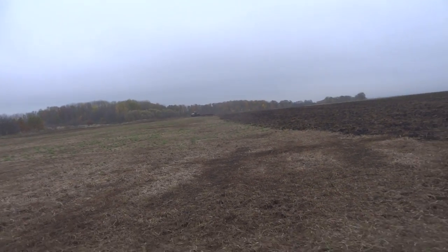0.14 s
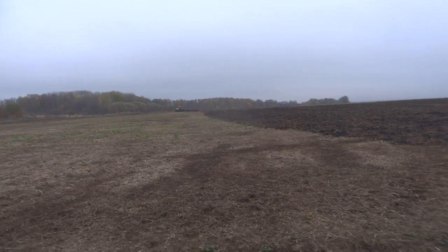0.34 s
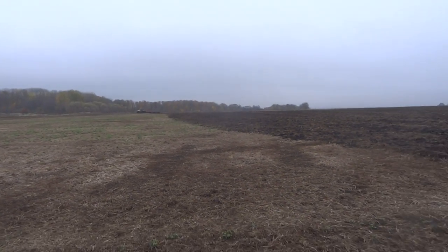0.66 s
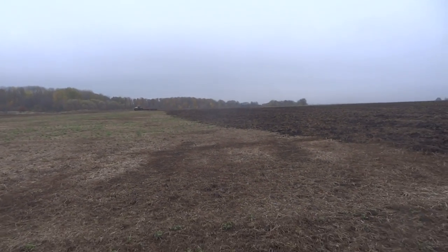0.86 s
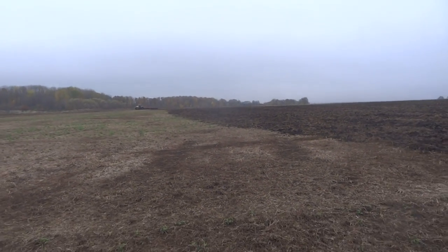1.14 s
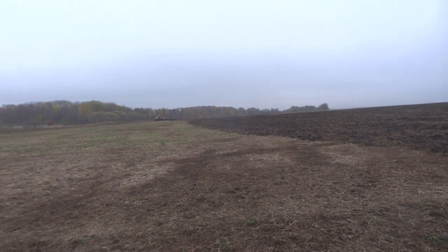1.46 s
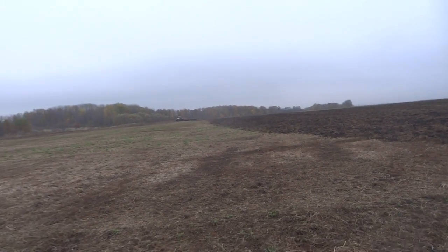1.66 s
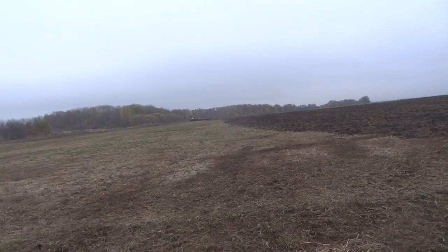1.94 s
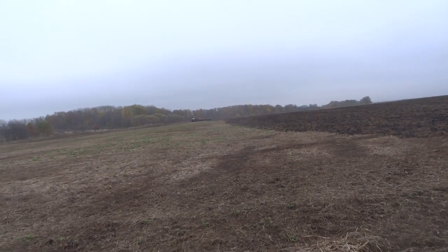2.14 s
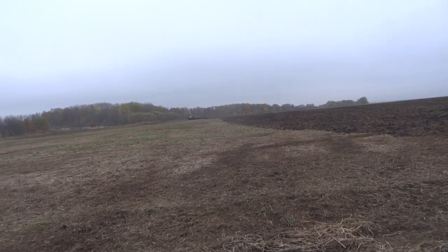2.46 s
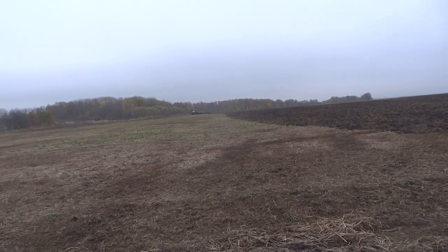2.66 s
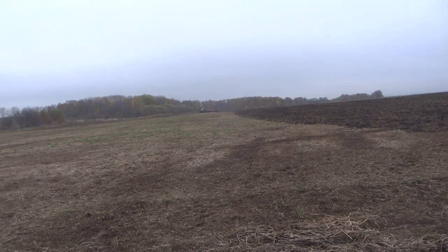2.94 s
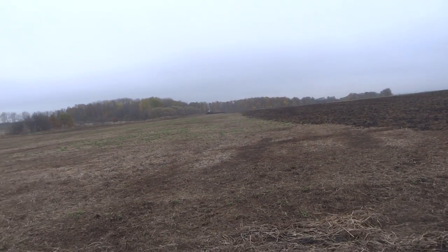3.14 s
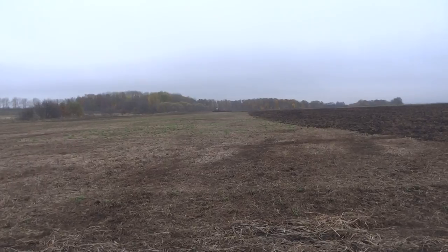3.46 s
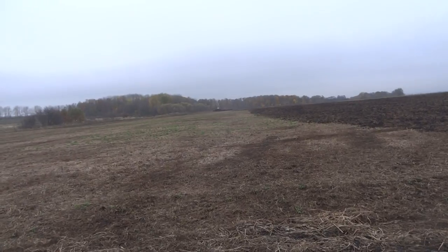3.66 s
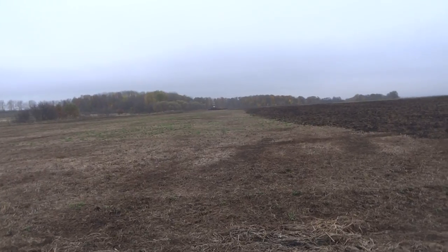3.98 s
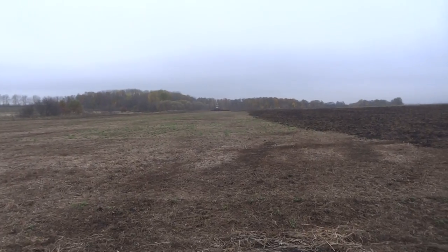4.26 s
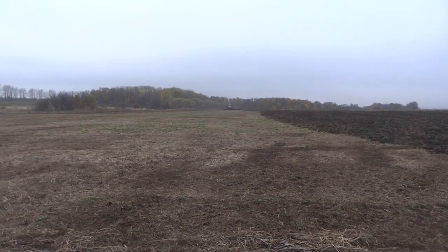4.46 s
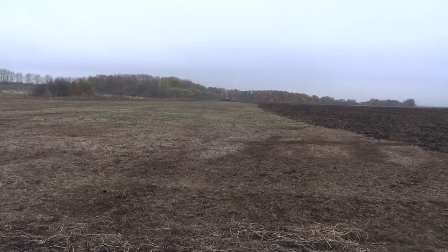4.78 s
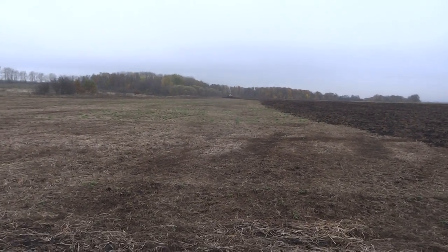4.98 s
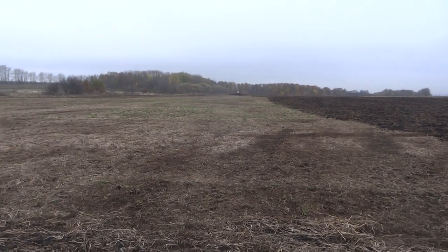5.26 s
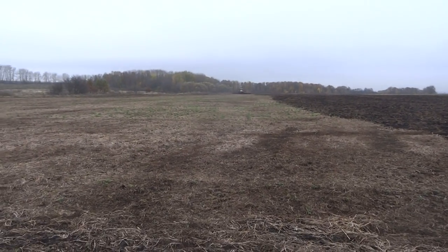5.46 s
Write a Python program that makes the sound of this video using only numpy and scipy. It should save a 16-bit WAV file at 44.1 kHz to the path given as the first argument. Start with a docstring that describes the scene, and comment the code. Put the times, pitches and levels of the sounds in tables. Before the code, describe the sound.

A far tractor holds a low, nearly constant diesel hum with faint clatter and metallic rattle in an open field. Wind rushes, hisses and rumbles on an unshielded hand-held microphone. Thumps crowd together from half a second to one and a half, strike hard again around three, then after a bright sleeve swish and dry ticks near four seconds, return around four and a half as the wind strengthens.

```python
"""From the start a far tractor drones over a field (exhaust sines, pulsed noise for clatter and rattle) while
wind rushes, hisses, fizzes and thinly whistles (coloured noise) and rumbles on a hand-held camera's microphone.
A sleeve rubs (grainy noise) and a tick rings the case (sines); from 0.5 s eddies thump (noise bursts), in clusters.
Around 4.1 s the sleeve swishes amid scrapes and ticks; then thumps, rubs and wind go on.
Throughout, a limiter ducks everything under loud thumps."""
import sys
import numpy as np
from scipy import signal
from scipy.fft import rfft, irfft, next_fast_len
from scipy.io import wavfile
from scipy.ndimage import uniform_filter1d, minimum_filter1d, map_coordinates

SR = 44100
rng = np.random.default_rng(int(sys.argv[2]) if len(sys.argv) > 2 else 0)


def int16_out(signal):
    """Quantize to a 16-bit WAV file."""
    q = np.round(np.clip(np.atleast_2d(signal).T, -1, 1) * 32767)
    wavfile.write(sys.argv[1], SR, q.astype(np.int16))


N = 247401

# Exhaust drone. Each row: time in seconds, rms level in dB.
DRONE_LEVEL_DB = [(0, -32), (.6, -31), (1.3, -32), (2.1, -27), (2.8, -27), (3.6, -28), (4.2, -26),
                  (4.9, -31.5), (5.6, -30)]
# Exhaust lines. Each row: multiple of half the firing rate, relative level in dB.
EXHAUST_LINES = [(2, 0.5), (3, -17.5), (4, -23.5), (5, -33)]
# Firings per second, and the spread of their random wander.
FIRING_HZ, HUNT_HZ = 105.6, 0.24
# Engine clatter. Each row: time in seconds, level in dB.
CLATTER_LEVEL_DB = [(0.0, -46.5), (0.87, -45.5), (1.4, -45), (1.76, -44.5), (2.28, -41), (2.86, -47.5),
                    (3.8, -47), (4.29, -44), (5.6, -43.5)]
# Colour of the engine block's clatter. Each row: frequency in Hz, relative density in dB per Hz.
BLOCK_SPECTRUM = [(250, -28), (560, 3), (850, -4.5), (1230, 2), (1600, -8.5), (16000, -62)]
# Rattle of tracks and disks across the field. Each row: time in seconds, level in dB.
RATTLE_LEVEL_DB = [(0, -38), (.24, -37.5), (.6, -56), (1.1, -45), (1.32, -43.5), (2.0, -44), (2.65, -46.5),
                   (3.17, -54), (3.8, -46), (5.6, -47.5)]
# Colour of the steel tracks and disks. Each row: frequency in Hz, relative density in dB per Hz.
LINKS_SPECTRUM = [(600, -35), (1800, -2.5), (2800, 0.5), (3700, -5), (11000, -51)]
# Bands of clatter that ring out. Each row: middle in seconds, level in dB, length in seconds, centre in Hz.
CLATTER_RINGS = [(0.06, -44, 0.13, 2850), (0.1, -46, 0.25, 3620), (0.2, -44, 0.47, 1600),
                 (1.008, -43, 0.94, 1890), (1.304, -38.5, 0.34, 1300), (1.396, -57, 0.52, 3600),
                 (2.04, -48, 0.18, 3900), (2.545, -48.5, 0.28, 2700), (3.396, -50.5, 0.66, 1670),
                 (4.31, -41.5, 0.39, 1103), (4.943, -41, 0.42, 1094)]
# Bounce off whoever holds the camera, later as the arm reaches out. Each row: time in seconds, delay in seconds.
ECHO_DELAY_S = [(.1, .00174), (.9, .00163), (1.6, .00166), (2.3, .00175), (3.3, .00182), (4.4, .00183),
                (5.6, .00176)]
TRACTOR_ECHO_DB = -4

# Low rush over the field. Each row: time in seconds, level in dB.
RUSH_LEVEL_DB = [(0.0, -46.5), (1.71, -45.5), (2.23, -55), (3.36, -46.5), (3.62, -38.5), (3.8, -43.5),
                 (4.74, -41), (4.97, -37), (5.6, -38.5)]
# Colour of the rush. Each row: frequency in Hz, relative density in dB per Hz.
RUSH_SPECTRUM = [(200, -26), (420, -2.5), (600, -3), (900, 0), (1450, -2), (2000, -8), (3000, -27),
                 (8000, -60)]
# Hiss in the stubble. Each row: time in seconds, level in dB.
HISS_LEVEL_DB = [(0, -38), (.42, -39.5), (1.06, -42), (1.91, -50.5), (3.12, -55), (4.12, -47), (4.35, -34),
                 (4.56, -33.5), (4.69, -41.5), (5.12, -40.5), (5.3, -35.5), (5.6, -37)]
# Colour of the hiss. Each row: frequency in Hz, relative density in dB per Hz.
HISS_SPECTRUM = [(700.0, -43), (1150.0, 3.5), (1600.0, 4.5), (2300.0, 7), (2900.0, 6.5), (3500.0, -3.5),
                 (5000.0, -30)]
# Fizz in the dry straw. Each row: time in seconds, level in dB.
FIZZ_LEVEL_DB = [(0.0, -48.5), (0.26, -49.5), (0.81, -54), (2.02, -50.5), (2.8, -53.5), (3.15, -56),
                 (3.45, -55), (4.02, -53.5), (4.44, -46), (4.7, -50), (5.18, -48.5), (5.6, -50.5)]
# Colour of the fizz. Each row: frequency in Hz, relative density in dB per Hz.
FIZZ_SPECTRUM = [(2600.0, -35), (3400.0, -1), (4300.0, 3), (5600.0, -2.5), (7500.0, -8), (13000.0, -44),
                 (16000.0, -36)]

# Whistle centre. Each row: time in seconds, frequency in Hz.
WHISTLE_PITCH_HZ = [(0, 6706), (1, 6780), (4.5, 6880), (5.05, 6406), (5.6, 6875)]
# Whistle puffs. Each row: middle in seconds, level in dB before PUFF_TRIM_DB, length in seconds.
WHISTLE_PUFFS = [(.2, -42.5, 0.053), (1.9, -43, 0.16), (2.23, -41.5, 0.16), (2.74, -43, 0.044),
                 (2.97, -51, 0.1), (3.44, -42, 0.055), (5.27, -46.5, 0.18)]
# Idle level against the fizz, and trim on the puffs.
WHISTLE_IDLE_DB, PUFF_TRIM_DB = -1.0, -4.5

# Wind rumble between eddies. Each row: time in seconds, level in dB before BUFFET_LIFT_DB and BUFFET_SWING.
BUFFET_CURVE_DB = [(0.0, -36.5), (0.44, -45), (1.27, -35), (2.36, -45), (3.2, -37), (3.83, -52.5),
                   (4.27, -37), (4.75, -31), (5.31, -42)]
# Lift of the rumble's mean level, and factor on its dB swing about that mean.
BUFFET_LIFT_DB, BUFFET_SWING = 8.0, 0.79
# Colour of the rumble. Each row: frequency in Hz, relative density in dB per Hz.
RUMBLE_SPECTRUM = [(10, 0), (22, -30), (35, -3), (65, 1.5), (100, 2), (170, -6), (240, -13), (320, -22),
                   (700, -52)]
# Eddies on the microphone. Each row: start in seconds, force in dB before trims, length in seconds.
EDDY_HITS = [(0.531, -25.5, 0.037), (0.718, -18.5, 0.0098), (0.746, -19.5, 0.037), (0.773, -16, 0.039),
             (0.838, -15, 0.023), (0.873, -14.5, 0.019), (1.022, -26.5, 0.048), (1.071, -19, 0.012),
             (1.128, -10.5, 0.031), (1.29, -15, 0.027), (1.425, -23.5, 0.04), (1.484, -15, 0.037),
             (1.548, -15.5, 0.024), (1.909, -21, 0.067), (2.046, -24.5, 0.052), (2.088, -30, 0.025),
             (2.791, -28.5, 0.036), (3.011, -16.5, 0.03), (3.032, -11.5, 0.034), (3.066, -11.5, 0.056),
             (3.11, -13, 0.045), (3.259, -26.5, 0.033), (3.385, -30, 0.039), (4.082, -26.5, 0.035),
             (4.305, -30, 0.028), (4.387, -23, 0.045), (4.543, -20.5, 0.041), (4.614, -17, 0.025),
             (4.662, -11.5, 0.025), (4.721, -14, 0.024), (4.753, -13.5, 0.054), (4.856, -23.5, 0.093),
             (4.938, -19.5, 0.087), (5.09, -21, 0.031), (5.212, -29, 0.019)]
# Each eddy drags a wake of rumble: level against the eddy's force, and length over the eddy's.
WAKE_DB, WAKE_STRETCH = -15.5, 1.67
# Colour of the eddies. Each row: frequency in Hz, relative density in dB per Hz.
EDDY_SPECTRUM = [(25, -12), (70, -8), (150, 5.5), (240, -2.5), (350, -11.5), (480, -16.5), (900, -38),
                 (2000, -78)]
# Flutter of air tearing off each port. Each row: frequency in Hz, relative density in dB per Hz.
TEAR_SPECTRUM = [(170, -37), (310, 6), (500, -6.5), (1000, -18.5), (2500, -58)]
# Eddy travel from left port to right as the wind turns. Each row: time in seconds, lag in seconds.
CROSSING_LAG_S = [(.8, -.0007), (1.4, -.0011), (3.1, -.0007), (4.4, .0008), (5.1, .0006)]

# Sleeve rubs. Each row: middle in seconds, level in dB, length in seconds, treble gain in dB.
SLEEVE_RUBS = [(.15, -60, 0.14, 2), (2.032, -55, 0.46, -2), (2.99, -53.5, 0.091, 4), (3.44, -58, 0.2, 3),
               (3.8, -57, 0.38, 2), (4.477, -45.5, 0.19, -8), (4.825, -49.5, 0.17, -9),
               (5.382, -52.5, 0.57, -16)]
# Constant faint stirring, and where the treble begins.
STIR_DB, TREBLE_HZ = -65.5, 11200
# Colour of the cloth. Each row: frequency in Hz, relative density in dB per Hz.
CLOTH_SPECTRUM = [(2500, -21), (6000, -2), (8000, 2.5), (9000, 3.5), (9800, 6), (10800, -3), (13000, 4.5),
                  (15800, -17)]
# Brief scrapes. Each row: start in seconds, level in dB before a 0.5 dB cut, length in seconds.
SLEEVE_SCRAPES = [(3.9, -37, 0.089), (4.087, -35, 0.078), (4.59, -38, 0.029), (4.8, -38.5, 0.049)]
# Colour of scrapes and of tick grit. Each row: frequency in Hz, relative density in dB per Hz.
SCRAPE_SPECTRUM = [(700, 3), (1500, 5.5), (6000, 1), (9800, -4), (13000, -7), (15800, -13)]
# Long swish, falling in pitch as the sleeve slows. Each row: time in seconds, centre in Hz, level in dB.
SLEEVE_SWISH = [(3.5, 13200, -100), (3.76, 12900, -58), (4.07, 12140, -54.5), (4.115, 9900, -32),
                (4.165, 9900, -48), (4.27, 9630, -39.5), (4.45, 8280, -57), (4.6, 8400, -100)]
SWISH_HALF_WIDTH_HZ = 1150

# Hand on the camera. Each row: start in seconds, level in dB, body-mode gain in dB, left over right in dB.
HAND_TICKS = [(0.203, -28, -20, -1), (3.74, -27, -20, 2), (3.9079, -25.5, 8, -11), (3.9094, -26, 7, -6),
              (3.934, -28, 2, 16), (4.088, -20, -2, 4), (4.0908, -14.5, -1, 6), (4.1915, -11.5, -2, 4.5),
              (4.4135, -20, 4, 5), (4.962, -31.5, 9, -13)]
# Camera case modes. Each row: frequency in Hz, relative level in dB.
CASE_MODES = [(1450, 0.5), (3600, -7.5), (5300, -9), (7200, -7), (9700, -3.5), (11300, -18.5)]
CASE_T60_S, BODY_BELOW_HZ = .008, 4500

# Left-right likeness of stereo noise. Each row: frequency in Hz, coherence from 0 to 1.
COHERENCE = [(30, 1), (100, 0.27), (400, 0.58), (800, 0.92), (1500, 0.96), (8000, 1), (13000, 0.93)]
TOP_HZ = 15850


def amp(db):
    """Decibels to gain."""
    return 10 ** (np.asarray(db) / 20)


def unit(x):
    """Scale to rms 1."""
    return x / np.sqrt(np.mean(x ** 2) + 1e-20)


def along(points, hz):
    """Interpolate (Hz, value) points on a log axis."""
    f, v = np.transpose(points)
    return np.interp(np.log(hz + 1), np.log(f + 1), v)


def curves(rows):
    """One value per sample for each column after the time."""
    s, *cols = np.transpose(rows)
    return [np.interp(np.arange(N) / SR, s, c) for c in cols]


def wobble(rate_hz):
    """Smooth random curve through rate_hz normal-distributed knots a second."""
    knots = rng.standard_normal(int(N * rate_hz / SR) + 4)
    return map_coordinates(knots, [np.arange(N) * rate_hz / SR])


def filtered(x, response):
    """Multiply the spectrum of x by a response of frequency."""
    m = next_fast_len(N + SR // 2)
    return irfft(rfft(x, m) * response(np.fft.rfftfreq(m, 1 / SR)), m)[..., :N]


def spread(pair, response):
    """Colour two unrelated signals and mix them to left and right at the tabled coherence, rms 1."""
    def mid_side_response(hz):
        angle = np.arccos(np.clip(along(COHERENCE, hz), -1, 1)) / 2
        return response(hz) * np.array([np.cos(angle), np.sin(angle)])

    mid, side = filtered(pair, mid_side_response)
    return unit(np.array([mid + side, mid - side]))


def patchy(depth_db):
    """Two white noises sharing patches of random gain in time and frequency."""
    z = signal.stft(rng.standard_normal((2, N)), nperseg=512)[2]
    field = uniform_filter1d(rng.standard_normal(z.shape[1:]), size=9, axis=0)
    field = uniform_filter1d(field, size=14, axis=1)
    return signal.istft(z * amp(depth_db * unit(field)), nperseg=512)[1][:, :N]


def coloured(spectrum, patchy_db=0):
    """Stereo noise of rms 1 with the given spectrum."""
    return spread(patchy(patchy_db), lambda hz: amp(along(spectrum, hz)))


def even(x, span_s):
    """Divide a noise by its running rms over span_s."""
    power = uniform_filter1d(np.mean(x ** 2, 0), int(span_s * SR) + 1)
    return x / np.sqrt(np.abs(power) + 1e-4)


def swells(rows, rise_s):
    """Envelope of (start s, dB, length s) bursts: quick rise, hold, fall."""
    envelope = np.zeros(N)
    for s, db, length in rows:
        age = np.maximum(np.arange(N) / SR - s, 0)
        fall = np.exp(-np.minimum(age / length, 10) ** 3)
        envelope += amp(db) * (1 - np.exp(-age / rise_s)) * fall
    return envelope


def humps(rows):
    """Envelope of (middle s, dB, length s) Gaussian swells."""
    t = np.arange(N) / SR
    return sum(amp(db) * np.exp(-2 * ((t - s) / length) ** 2) for s, db, length in rows)


def delayed(x, lag_s):
    """x late by a changing lag."""
    n = np.arange(N)
    return np.interp(n - lag_s * SR, n, x)


def echoed(pair, echo_db):
    """Add the close echo, which combs noise into drifting bands at about the same power."""
    lag_s, gain = curves(ECHO_DELAY_S)[0], amp(echo_db)
    return np.array([x + gain * delayed(x, lag_s) for x in pair]) / np.hypot(1, gain)


def resonant(centre_hz, width_hz, hz):
    """Gain of one resonance, halved at the edges of its width."""
    return 1 / (1 + (2 * (hz - centre_hz) / width_hz) ** 2)


def narrow(centre_hz, half_width_hz):
    """Stereo noise band, frequency-shifted so that its centre follows a curve."""
    middle_hz = centre_hz.mean()
    band = spread(rng.standard_normal((2, N)),
                  lambda hz: 1 / np.sqrt(1 + ((hz - middle_hz) / half_width_hz) ** 6))
    analytic = signal.hilbert(band, next_fast_len(N))[:, :N]
    return np.real(analytic * np.exp(2j * np.pi * np.cumsum(centre_hz - middle_hz) / SR))


def tractor():
    """Exhaust firings drone and pulse the noise of block, tracks and disks; an echo combs all noise but the rings."""
    firings = np.cumsum(FIRING_HZ + HUNT_HZ * wobble(5.07)) / SR
    drone = np.zeros(N)
    for order, db in EXHAUST_LINES:
        # odd orders, from unequal cylinders, lie between the firing harmonics; all but the first line waver more
        waver_db = 1.1 if order == 2 else 3
        phase = np.pi * order * firings + waver_db ** 2 / 7 * wobble(22)
        drone += amp(db + waver_db * wobble(7.5)) * np.sin(phase)
    drone = amp(curves(DRONE_LEVEL_DB)[0]) * unit(drone)
    shake = amp(1.56 * np.cos(2 * np.pi * firings) + 1.3 * wobble(70))

    def shaken(response):
        return spread(shake * patchy(depth_db=1.0), response)

    engine = amp(curves(CLATTER_LEVEL_DB)[0]) * shaken(lambda hz: amp(along(BLOCK_SPECTRUM, hz)))
    tracks = amp(curves(RATTLE_LEVEL_DB)[0]) * shaken(lambda hz: amp(along(LINKS_SPECTRUM, hz)))
    rings = np.zeros((2, N))
    for s, db, length, centre_hz in CLATTER_RINGS:
        rings += humps([(s, db, length)]) * shaken(lambda hz: resonant(centre_hz, 0.14 * centre_hz, hz))
    return drone + echoed(engine + tracks, TRACTOR_ECHO_DB) + rings


def field_wind():
    """Turbulent noise: a low rush over the field, hiss in the stubble, fizz in the dry straw."""
    surge_db = 0.8 * wobble(40)  # shared by hiss and fizz
    low = amp(curves(RUSH_LEVEL_DB)[0]) * coloured(RUSH_SPECTRUM, patchy_db=2.0)
    hiss = echoed(coloured(HISS_SPECTRUM, patchy_db=1.8), echo_db=-18)
    hiss = amp(curves(HISS_LEVEL_DB)[0] + surge_db) * hiss
    fizz = amp(curves(FIZZ_LEVEL_DB)[0] + surge_db) * coloured(FIZZ_SPECTRUM, patchy_db=2.0)
    return low + hiss + fizz


def whistle():
    """Narrow band of high hiss that idles with the fizz, swells in puffs, wanders in pitch and flickers."""
    idle = amp(curves(FIZZ_LEVEL_DB)[0] + WHISTLE_IDLE_DB)
    level = idle + amp(PUFF_TRIM_DB) * humps(WHISTLE_PUFFS)
    flicker = amp(2.36 * wobble(35))
    centre_hz = curves(WHISTLE_PITCH_HZ)[0] + 60 * wobble(25)
    return level * flicker * narrow(centre_hz, half_width_hz=270)


def buffeting():
    """Air tumbles over the microphone: a fluttering rumble, and hard eddies that sweep from port to port."""
    wake_rows = [(s, db + WAKE_DB, length * WAKE_STRETCH) for s, db, length in EDDY_HITS]
    wakes = swells(wake_rows, rise_s=0.0028)
    buffet_db = curves(BUFFET_CURVE_DB)[0]
    mean_db = buffet_db.mean()
    steady = amp(mean_db + BUFFET_LIFT_DB + BUFFET_SWING * (buffet_db - mean_db))
    rumble = (steady + wakes) * amp(2.17 * wobble(30)) * even(coloured(RUMBLE_SPECTRUM), span_s=0.0404)

    force = swells(EDDY_HITS, rise_s=0.003)
    swirl = force * even(coloured(EDDY_SPECTRUM)[:1], span_s=0.0123)[0]
    # strong eddies steepen into sharp crests and round troughs, and so grow brighter
    steep = 0.84 * swirl ** 2
    swirl = swirl + steep - uniform_filter1d(steep, size=700)
    lag_s = curves(CROSSING_LAG_S)[0]
    ports = np.array([delayed(swirl, -lag_s / 2), delayed(swirl, lag_s / 2)])

    def port_noise(spectrum):
        return unit(filtered(rng.standard_normal((2, N)), lambda hz: amp(along(spectrum, hz))))

    # each port also sheds small eddies of its own; tearing grows with the square of the force
    eddies = amp(-2.0) * (ports + 0.19 * force * port_noise(EDDY_SPECTRUM))
    tearing = amp(-1.5) * force ** 2 * port_noise(TEAR_SPECTRUM)
    return rumble + eddies + tearing


def sleeve():
    """Fibres catch and slip in tiny grains: high and soft in a rub, broader in a scrape, pitched in the swish."""
    grains = unit(amp(1.4 * wobble(700) + 1.6 * wobble(70)))
    cloth = coloured(CLOTH_SPECTRUM)
    treble = filtered(cloth, lambda hz: 1 - 1 / (1 + (hz / TREBLE_HZ) ** 20))
    stir = amp(STIR_DB) * (cloth - treble)
    rubs = np.zeros((2, N))
    for s, db, length, treble_db in SLEEVE_RUBS:
        rubs += humps([(s, db, length)]) * (cloth + (amp(treble_db) - 1) * treble)
    scrapes = amp(-0.5) * swells(SLEEVE_SCRAPES, rise_s=0.00088) * coloured(SCRAPE_SPECTRUM)
    swish_hz, swish_db = curves(SLEEVE_SWISH)
    swish = amp(swish_db) * narrow(swish_hz, SWISH_HALF_WIDTH_HZ)
    return grains * (stir + rubs + scrapes + swish)


def ticks():
    """Small dry snaps: a burst of grit with decaying modes of the camera's case."""
    snap, ring = np.zeros((2, 2, N))
    t = np.arange(SR // 20) / SR
    onset = 1 - np.exp(-t / 0.0003)
    for s, db, body_db, pan_db in HAND_TICKS:
        fade = amp([[db + pan_db / 2], [db - pan_db / 2]]) * amp(-60 * t / CASE_T60_S) * onset
        modes = np.zeros(len(t))
        for hz, level_db in CASE_MODES:
            gain = amp(level_db + body_db * (hz < BODY_BELOW_HZ))
            detuned_hz = hz * (1 + 0.045 * rng.standard_normal())
            modes += gain * np.sin(2 * np.pi * detuned_hz * t)
        start = round(s * SR)
        snap[:, start:start + len(t)] += fade
        ring[:, start:start + len(t)] += fade * modes
    return ring + amp(-5.0) * snap * coloured(SCRAPE_SPECTRUM)


def scene():
    """Sum the far tractor, the open field and the sounds at the camera."""
    far = tractor()
    near = field_wind() + whistle() + buffeting() + sleeve() + ticks()
    return far + near * amp([[.3], [-.3]])  # left 0.6 dB over right


def record(dry):
    """Limiter: loud peaks duck both channels, gain recovers at a fixed dB rate; then a band limit."""
    ceiling_db, release_db_per_s = -12.0, 70
    peak = np.abs(uniform_filter1d(dry.mean(0), size=40))
    over_db = np.maximum(20 * np.log10(peak + 1e-9) - ceiling_db, 0)
    recovery_db = release_db_per_s * np.arange(N) / SR
    duck_db = np.maximum.accumulate(over_db + recovery_db) - recovery_db
    # spread the dips over 300 samples, then smooth them
    gain = uniform_filter1d(minimum_filter1d(amp(-duck_db), size=300), size=300)
    return filtered(dry * gain, lambda hz: hz < TOP_HZ)


dry = scene()
out = record(dry)
int16_out(out)
```